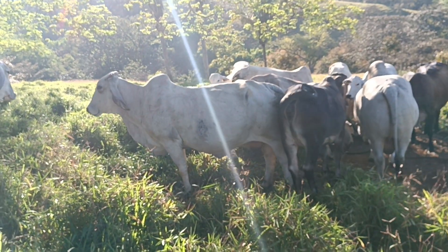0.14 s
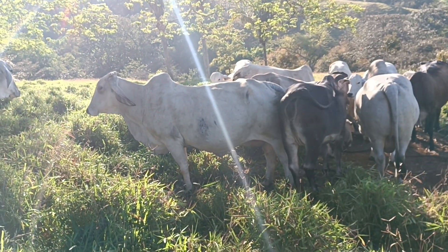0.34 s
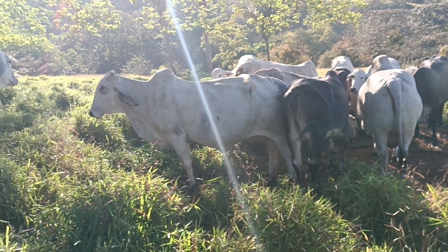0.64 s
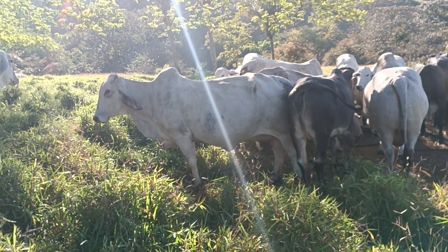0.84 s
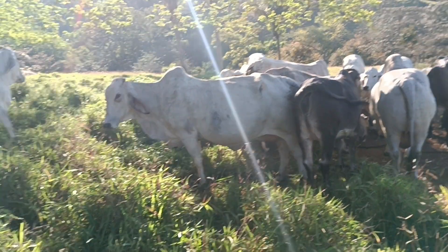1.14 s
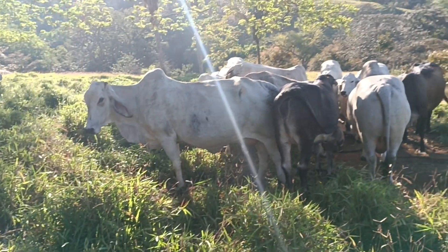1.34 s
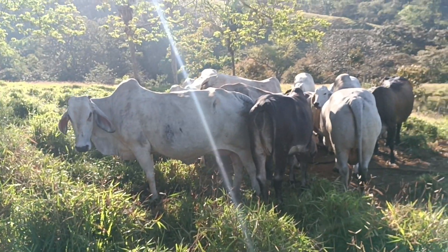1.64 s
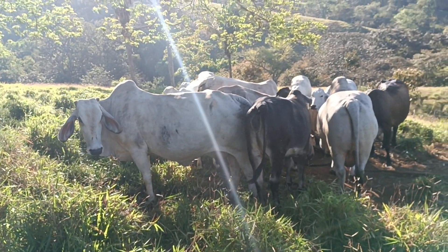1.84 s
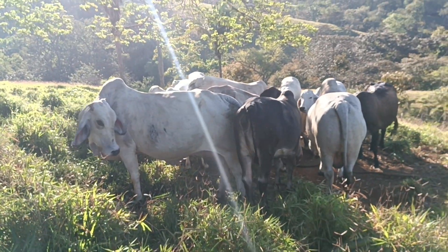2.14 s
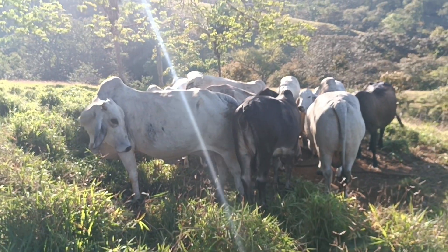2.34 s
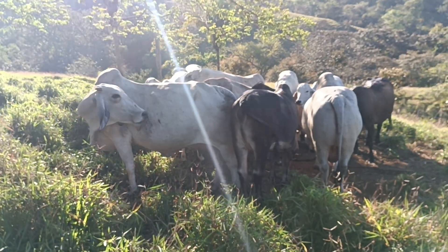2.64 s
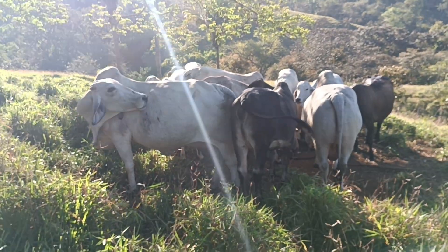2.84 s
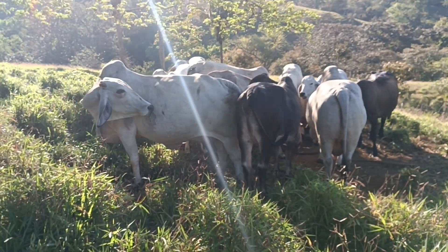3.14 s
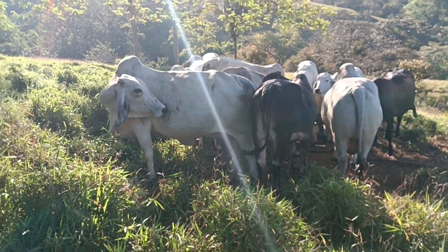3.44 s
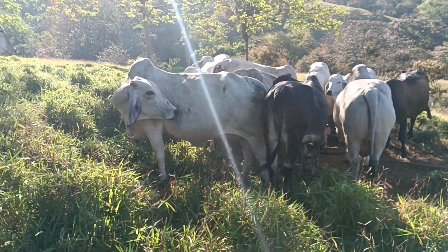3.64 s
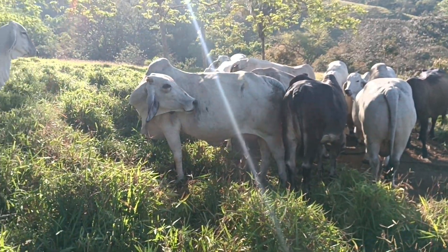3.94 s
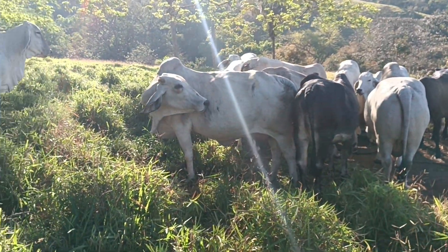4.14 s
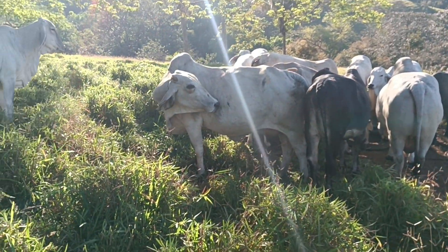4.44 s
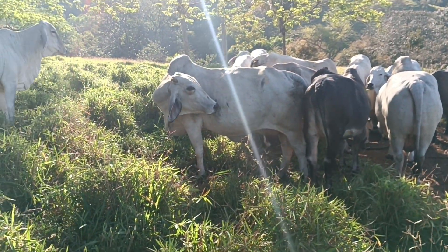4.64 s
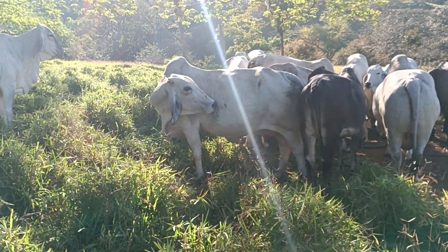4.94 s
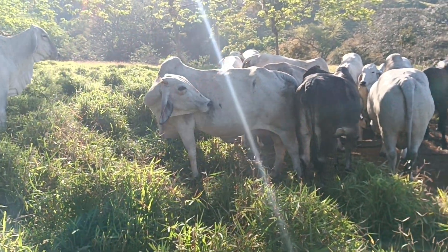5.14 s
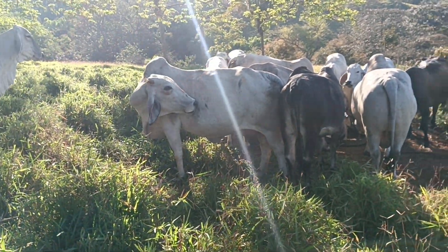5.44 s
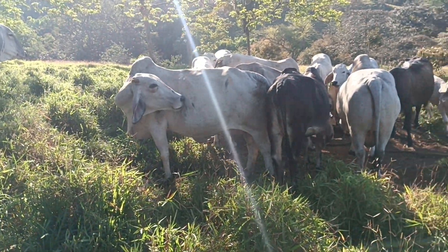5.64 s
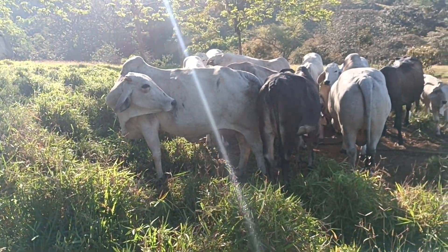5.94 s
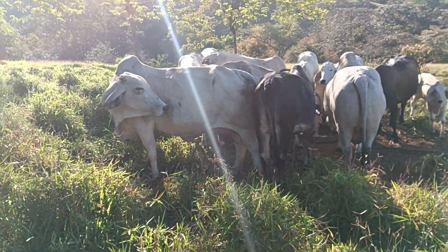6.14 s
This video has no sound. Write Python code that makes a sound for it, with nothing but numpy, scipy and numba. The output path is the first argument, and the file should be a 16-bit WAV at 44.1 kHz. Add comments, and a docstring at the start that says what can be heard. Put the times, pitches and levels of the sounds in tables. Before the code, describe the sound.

Breezy outdoor cattle field with low lumpy wind, twittering flock, dry grass rustles, faint scrapes, late clear bird whistles and two nose breaths.

```python
"""Breezy pasture with cattle and birds

Two phone ports hear wind as lumpy low noise, with sharp pops strongest at the right port. One bird whistles
three long calls of partials; a far flock chatters in short glides, with clear notes and squeaks nearer.
Cattle huff as noise through two resonances; short scrapes and grass are uneven clicks, over a far hiss.
"""
import sys
import numpy as np
from scipy import signal
from scipy.fft import rfft, irfft, next_fast_len
from scipy.io import wavfile
from scipy.ndimage import uniform_filter1d
from numba import njit

SR = 44100
rng = np.random.default_rng(int(sys.argv[2]) if len(sys.argv) > 2 else 0)


def master_out(mix):
    """Clip the mix to full scale and print it as 16-bit PCM to the path in sys.argv[1]."""
    frames = np.transpose(np.atleast_2d(mix))
    ceiling = np.clip(frames, -1, 1)
    pcm = np.round(ceiling * 32767).astype(np.int16)
    wavfile.write(sys.argv[1], SR, pcm)


N = 276759
T = np.arange(N) / SR
PORT_LAG_SAMPLES, WHISTLE_LAG_SAMPLES = 24, 23  # the whistle too reaches the left port first, by nearly the same lag


def undb(db):
    """Decibels to amplitude gain."""
    return 10 ** (np.asarray(db) / 20)


def level(x, db):
    """Scales x to an RMS level over all its samples."""
    return x * undb(db) / np.sqrt(np.mean(x ** 2))


def curves(rows):
    """Interpolates each column after the time over the whole scene."""
    s, *columns = np.transpose(rows)
    return [np.interp(T, s, c) for c in columns]


def colour(x, points):
    """Shapes a spectrum by (frequency [Hz], gain [dB]) points; -99 dB outside them."""
    length = x.shape[-1]
    size = next_fast_len(length)
    hz, db = np.transpose(points)
    log_bins = np.log(np.arange(size // 2 + 1) * SR / size + 1)
    gain = undb(np.interp(log_bins, np.log(hz), db, -99, -99))
    return irfft(rfft(x, size) * gain, size)[..., :length]


@njit
def svf(x, hz, width_hz):
    """State-variable band-pass with a moving centre, gain 1 there."""
    y, band, low = np.empty(len(x)), 0., 0.
    for i in range(len(x)):
        g, k = np.tan(np.pi * hz[i] / SR), width_hz / hz[i]
        v = (band + g * (x[i] - low)) / (1 + g * (g + k))
        band, low, y[i] = 2 * v - band, low + 2 * g * v, k * v
    return y


def walk(rate_hz):
    """Random levels held 1 / rate_hz s and slewed twice; spread near 1."""
    k = int(SR / rate_hz)
    steps = np.repeat(rng.standard_normal(N // k + 1), k)
    return 1.19 * uniform_filter1d(uniform_filter1d(steps, k), k)[:N]


def add(out, x, s):
    """Mixes x into out from time s, cut at the end."""
    i = int(s * SR)
    out[..., i:i + x.shape[-1]] += x[..., :max(N - i, 0)]


def apart(pan_db):
    """Gains of two unrelated port signals whose mean has level 1."""
    return 2 / np.sqrt(1 + undb(2 * np.array([-pan_db, pan_db])))


def ports(x, pan_db, lag_samples=PORT_LAG_SAMPLES):
    """Far sound reaches the left port first."""
    return np.array([x * undb(pan_db / 2), np.roll(x * undb(-pan_db / 2), lag_samples)])


def note(rows, partials, fade_s, rough):
    """A bird's note from rows (time [s], pitch [Hz], level [dB]): partials on one pitch, hoarse, faded at both ends."""
    s, hz, db = np.transpose(rows)
    t = np.arange(s[0], s[-1], 1 / SR)
    phase = 2 * np.pi * np.cumsum(np.interp(t, s, hz)) / SR
    edge = np.clip(np.minimum(t - t[0], t[-1] - t) / fade_s, 0, 1)
    # hoarseness: phase and amplitude waver by noise about 200 Hz wide
    phase_waver, level_waver = uniform_filter1d(rng.standard_normal((2, len(t))), 100) * 10 * rough
    tone = sum(undb(d) * np.sin(k * phase + phase_waver) for k, d in partials if k * hz.max() < .45 * SR)
    return np.sqrt(2) * tone * (1 + level_waver) * edge * undb(np.interp(t, s, db))


def glide(s, length_s, first_hz, last_hz, bow_hz, db, ends_db):
    """Rows of a note that slides between two pitches along a bow and swells in the middle."""
    u = np.linspace(0, 1, num=12)
    arch = 4 * u * (1 - u)
    hz = first_hz + (last_hz - first_hz) * u + bow_hz * arch
    return np.c_[s + u * length_s, hz, db + ends_db * (1 - arch)]


# wind at the ports: (time [s], level [dB], left minus right [dB], flutter above the rumble [dB])
WIND_CURVES = [(0, -41.5, -1, -0.5), (.3, -40.5, -11, 0.5), (.55, -41.5, -9.5, -0.5), (.8, -41, -19, 1),
               (1.2, -45, -14, -1.5), (1.5, -44, -7.5, -2), (1.8, -48, -12, 0), (2.1, -46, -5.5, -2),
               (2.45, -41.5, -20, 3.5), (2.72, -47, -11.5, 1), (3.1, -43.5, -20, 1), (3.39, -39.5, -23, 1),
               (3.5, -46, -10.5, -1.5), (3.85, -42.5, -8, -1), (4.25, -44.5, -14, -1), (4.4, -50.5, -11, 0),
               (5.1, -54, -1, -2), (5.4, -54.5, -14, -2.5), (5.7, -49, 7, -4), (6.0, -50.5, -12, 0),
               (6.28, -44.5, -12, 1)]
# wind spectrum: (frequency [Hz], relative density [dB per Hz])
WIND_SPECTRUM = [(15, -46), (25, -33.5), (67, 2.5), (134, 2.5), (181, -4.5), (297, -13.5), (335, -16),
                 (372, -20), (900, -41), (1170, -61), (1980, -120)]
# single buffets that stand out: (time [s], rise [dB], shift of left minus right [dB])
WIND_BUFFETS = [(0.161, 5.5, -8), (0.269, 6, -6), (.385, 5, 2), (.635, 7, -18), (1.05, 6.5, 1),
                (1.15, 12, -15), (1.31, 2.5, 17), (1.64, 3, -11), (1.96, 0.5, 15), (2.031, 8, 4),
                (2.295, 8.5, 0), (2.607, 8, -4), (3.79, 2.5, -3), (4.07, 5, -14), (4.96, 3.5, 0),
                (5.58, 9.5, 17), (5.68, 8, 10)]
BUFFET_S, GUST_DB, GUST_PAN_DB, GUST_HZ = 0.011, 1.5, 6, 12
RUMBLE_HZ, RUMBLE_PAN_SHARE = 95.6, 0.37  # the deepest wind is shared more evenly by the ports


def wind():
    """Each port has its own eddies: low noise that comes in quick lumps."""
    db, pan_db, flutter_db = curves(WIND_CURVES)
    db = db + GUST_DB * walk(GUST_HZ)
    pan_db = pan_db + GUST_PAN_DB * walk(GUST_HZ)
    for s, rise_db, shift_db in WIND_BUFFETS:
        bump = np.exp(-((T - s) / BUFFET_S) ** 2)
        db, pan_db = db + rise_db * bump, pan_db + shift_db * bump
    lumps = np.array([undb(1.2 * walk(24) + 3.2 * walk(70)) * rng.standard_normal(N) for _ in range(4)])
    eddies = colour(lumps, WIND_SPECTRUM)
    eddies = eddies / eddies.std(axis=1, keepdims=True) * undb(db)
    deep = colour(eddies, [(1, 0), (RUMBLE_HZ, 0), (1.87 * RUMBLE_HZ, -30)])
    # large slow eddies make the rumble, small ones the flutter above it
    rumble = deep[:2] * apart(RUMBLE_PAN_SHARE * pan_db)
    flutter = (eddies - deep)[2:] * undb(flutter_db) * apart(pan_db)
    return rumble + flutter


# eddies that pop on the right port: (time [s], push peak [dB], push time scale [ms], wobble re push [dB])
POP_EVENTS = [(.908, -14, 0.31, -7), (0.9126, -17, 0.17, -4.5), (.956, -40, .32, -6), (1.037, -24, 0.34, 9),
              (1.127, -38, 0.35, 13), (1.147, -36, 0.27, 14.5), (1.18, -36.5, 0.28, -10),
              (1.361, -33.5, .37, 5), (1.398, -31.5, 0.11, 1), (1.409, -36, 0.18, -2), (1.878, -40, .47, 3),
              (2.369, -38, 0.45, -4), (2.702, -38, 0.27, 4), (3.322, -33, 0.5, -2),
              (3.356, -25.5, 0.39, 2.5), (3.395, -37, .49, 8), (4.801, -32.5, 0.42, 5),
              (5.437, -38.5, .44, -17), (6.133, -41, 1, 13), (6.178, -31, 0.17, -9),
              (6.184, -23.5, 0.35, 1), (6.215, -25.5, .71, 2), (6.231, -29.5, 0.11, -22),
              (6.2342, -31, .1, -6), (6.239, -36, 0.47, -4)]
WOBBLE_HZ, WOBBLE_DECAY_S, POP_LEFT_DB = 188, 0.0042, -33


def pops():
    """A sharp in-out push on the membrane, then a slow wobble of the air in the port."""
    out, t = np.zeros((2, N)), np.arange(1200) / SR
    after = np.maximum(t - .0032, 0)
    wobble = np.sin(2 * np.pi * WOBBLE_HZ * after) * np.exp(-after / WOBBLE_DECAY_S)
    for s, db, push_ms, wobble_db in POP_EVENTS:
        u = (t - .003) / (push_ms / 1000)
        push = u * np.exp(.5 - u ** 2 / 2)
        pop = undb(db) * (push - undb(wobble_db) * wobble)
        add(out, pop * undb([[POP_LEFT_DB], [0]]), s)
    return out


# calls: (time [s], length [s], first pitch [Hz], settled pitch [Hz], settling time constant [s],
# fundamental level [dB], its slope [dB/s], overtone level [dB], its slope [dB/s])
WHISTLE_CALLS = [(4.283, .21, 1202, 1294, 0.082, -46.5, -2, -62.5, 5),
                 (4.812, 0.49, 1229, 1313, 0.086, -49.5, -20, -61.5, 0.5),
                 (5.5, .5, 2459, 2538, .4, -99, 0, -62.5, -28)]
# per call, the partial near 2.5 kHz throbs and sways as it meets its own echoes, and rings on after the last
# call: (time [s], level [dB], left minus right [dB])
WHISTLE_THROB = [
    [(4.283, -57, 6), (4.3, -41, 10), (4.35, -44.5, 4), (4.4, -49, 5), (4.493, -55, 1)],
    [(4.812, -43, 0), (4.834, -35, 4), (4.9, -48.5, -1), (4.99, -38, 1), (5.06, -46.5, 0),
     (5.115, -41, -6.5), (5.15, -47, 3), (5.22, -37.5, 1), (5.25, -49, -4), (5.275, -38, 0),
     (5.307, -64, -6)],
    [(5.5, -46, 2), (5.52, -37.5, -4), (5.55, -33.5, -7.5), (5.6, -48, -4), (5.645, -31.5, -8.5),
     (5.7, -47.5, -11), (5.735, -38, -5), (5.775, -32, -3.5), (5.84, -55, 3), (5.873, -34, -2),
     (5.898, -51, -2), (5.922, -33.5, -9.5), (5.96, -58, -8), (6.05, -54.5, -9), (6.28, -58, -2)],
]
# overtones of the two low calls: (multiple [-], relative level [dB])
LOW_CALL_PARTIALS = [(3, -0.5), (4, -1.5), (5, -2), (6, -15), (7, -8), (8, -13), (9, -29)]
# overtones of the high call: (multiple [-], relative level [dB])
HIGH_CALL_PARTIALS = [(2, 3.5), (3, 6), (4, 7), (5, 0), (6, -14)]
END_SAG, END_SAG_S = 0.01183, 0.0645  # share of pitch lost as the breath runs out
FLUTTER_DB, FLUTTER_HZ = 4, 22  # each overtone wavers by itself
BLOOM_DB, BLOOM_S = -1, 0.11  # overtones start this much weaker per multiple and catch up


def whistler():
    """Two calls rich in partials, then one an octave up; each rises in pitch and its strongest partial throbs."""
    out = np.zeros((2, N))
    strong_multiples = (2, 2, 1)
    overtone_sets = (LOW_CALL_PARTIALS, LOW_CALL_PARTIALS, HIGH_CALL_PARTIALS)
    for call, throb, strong, overtones in zip(WHISTLE_CALLS, WHISTLE_THROB, strong_multiples, overtone_sets):
        s, length_s, first_hz, last_hz, settle_s, low_db, low_slope, over_db, over_slope = call
        at, throb_db, pan_db = np.transpose(throb)
        t = np.arange(0, max(at[-1] - s, length_s), .002)
        held = t < length_s
        hz = last_hz + (first_hz - last_hz) * np.exp(-t / settle_s)
        hz = hz * (1 - END_SAG * np.exp(np.minimum(t - length_s, 0) / END_SAG_S))
        voice = np.zeros(N)
        strong_rows = np.c_[s + t, hz, np.interp(s + t, at, throb_db)]
        add(voice, note(strong_rows, [(strong, 0)], 0.0033, 0.042), s)
        low_rows = np.c_[s + t, hz, low_db + low_slope * t][held]
        add(voice, note(low_rows, [(1, 0)], 0.014, .033), s)
        for partial in overtones:
            waver_db = FLUTTER_DB * np.interp(s + t, T, walk(FLUTTER_HZ))
            bloom_db = BLOOM_DB * partial[0] * np.exp(-t / BLOOM_S)
            rows = np.c_[s + t, hz, over_db + over_slope * t + waver_db + bloom_db][held]
            add(voice, note(rows, [partial], 0.0061, .05), s)
        out += ports(voice, np.interp(T, at, pan_db), WHISTLE_LAG_SAMPLES)
    return out


def chatter(throats, rough):
    """Many short gliding notes that overlap, from birds at all distances."""
    out = np.zeros(N)
    for hz, spread_hz, throat_db in throats:
        for at, pitch, slide, size, long in rng.random((300, 5)):
            mid_hz = hz + spread_hz * 3 * (pitch - .5)
            length_s = .015 + .04 * long
            start, note_db = at * T[-1], throat_db + 13 * size
            end_hz = mid_hz * (1 + 0.1018 * (slide - .5))
            rows = [(start, mid_hz, note_db), (start + length_s, end_hz, note_db)]
            add(out, note(rows, [(1, 0)], length_s / 2.3, rough), start)
    return level(out, 0)


# clear notes: (time [s], length [s], first pitch [Hz], last pitch [Hz], bow of the pitch [Hz], mid level [dB])
CLEAR_NOTES = [(.03, .07, 2800, 3440, 60, -52), (.11, 0.043, 1880, 1873, 3, -55),
               (.155, 0.058, 3030, 2885, -2, -43.5), (0.116, 0.031, 3750, 3770, 0, -58),
               (.325, 0.061, 3700, 3550, 64, -60), (.33, 0.043, 2980, 2905, -2, -51),
               (.5, .03, 3080, 3010, 0, -47), (.54, 0.042, 3120, 3215, 3, -43.5),
               (.612, 0.061, 3170, 3094, 4, -44.5), (.77, 0.037, 3050, 3150, 6, -51),
               (.885, 0.083, 3150, 3270, -2, -51), (1.0, 0.024, 2980, 2930, 0, -46),
               (1.228, 0.09, 2800, 3197, 230.5, -42.5), (1.307, 0.0244, 3255, 2590, 100, -40),
               (1.335, 0.075, 2900, 2920, -65, -49), (1.398, 0.026, 3350, 3370, 44, -46),
               (1.45, 0.041, 3200, 3070, -3, -57), (1.6, 0.049, 3100, 3105, 0, -54),
               (1.68, 0.056, 1920, 2050, -9, -58), (1.76, .11, 3020, 2845, 66, -49),
               (1.805, 0.027, 2030, 2040, 0, -53), (1.92, 0.027, 3080, 3040, -2, -48),
               (1.94, 0.031, 1910, 1930, -7, -52), (1.975, .085, 3130, 3096, 1.5, -44),
               (2.03, 0.033, 1920, 1990, -4, -56), (2.07, 0.043, 3080, 3030, -4, -47),
               (2.29, 0.041, 3100, 3220, -4, -53), (2.46, 0.043, 3200, 3130, 110, -46.5),
               (2.508, 0.024, 3100, 3040, 0, -43), (2.53, 0.038, 1990, 2060, -15, -47),
               (2.553, 0.064, 3100, 3215, -6, -46.5), (2.61, 0.034, 1900, 1970, -5, -51.5),
               (2.78, 0.039, 3070, 3040, -7, -48), (2.921, .05, 3500, 3640, -2, -54.5),
               (3.019, 0.037, 3850, 3910, 0, -55), (3.055, 0.064, 3140, 3205, 0, -49),
               (3.17, 0.036, 1820, 1900, 0, -53), (3.35, 0.048, 3150, 3000, 2, -51.5),
               (3.5, 0.066, 3350, 3250, 0, -48.5), (3.535, 0.028, 1930, 1954, -5, -53.5),
               (3.67, 0.039, 2880, 3100, -5, -53), (3.82, 0.074, 3110, 3050, -6, -50),
               (3.885, 0.06, 3100, 3173, 3, -46), (4.11, 0.033, 3050, 2970, 2, -49.5),
               (4.155, 0.024, 2100, 2320, -2, -51.5), (4.195, 0.043, 3080, 3020, 2, -46.5),
               (4.33, 0.026, 1920, 1880, 0, -54), (5.67, 0.038, 3010, 3060, 0, -47),
               (5.74, 0.065, 3070, 3100, 0, -47), (5.83, 0.081, 3200, 3540, -42, -50),
               (6.035, .06, 3050, 3150, 0, -56)]
NOTE_ENDS_DB, OCTAVE_DB, NOTE_ROUGH = -2, -21.5, .13  # ends re middle, second partial, hoarseness 0-1


def clear_notes():
    """The nearest birds of the flock: bowed glides with a weak second partial."""
    out = np.zeros(N)
    for row in CLEAR_NOTES:
        rows = glide(*row, NOTE_ENDS_DB)
        add(out, note(rows, [(1, 0), (2, OCTAVE_DB)], .006, NOTE_ROUGH), row[0])
    return out


# squeaks: (time [s], length [s], first pitch [Hz], last pitch [Hz], bow of the pitch [Hz], mid level [dB],
# hoarseness [0-1])
SQUEAK_NOTES = [(0.48, .07, 5500, 6000, 75, -58, .2), (1.62, .05, 8900, 8200, 0, -70, .1),
                (1.69, .15, 7750, 7900, -500, -62.5, 0.2), (2.84, .115, 8100, 4000, -550, -58, 0.37),
                (2.832, 0.081, 6600, 3900, -100, -62, .9), (3.0, .11, 1800, 750, -100, -54.5, 0.47),
                (5.855, .12, 1650, 1650, 130, -48.5, 0.54), (3.099, 0.19, 5950, 6360, 99, -53, 0.3),
                (3.21, .08, 6300, 6900, 100, -56, 0.5), (3.04, 0.15, 7300, 8400, 347, -63, .25),
                (4.87, 0.057, 7100, 7000, -60, -56.5, 0.5), (5.071, .1, 10800, 10930, 0, -60, .3),
                (5.393, 0.21, 11200, 9700, -2, -65, 0.3), (5.668, 0.098, 7400, 7800, 197, -55, .4),
                (5.617, 0.17, 5870, 6380, -77, -51.5, 0.4)]
SQUEAK_ENDS_DB = -10  # re middle


def squeaks():
    """Thin squeaks of small birds: one hoarse gliding partial each."""
    out = np.zeros(N)
    for *row, rough in SQUEAK_NOTES:
        add(out, note(glide(*row, SQUEAK_ENDS_DB), [(1, 0)], 0.014, rough), row[0])
    return out


# flock chatter: (time [s], main voices level [dB], lower voices level [dB], upper voices level [dB],
# left minus right [dB])
FLOCK_CURVES = [(0, -49.5, -62, -70, 1), (.35, -58, -60, -67, -1.5), (.55, -51.5, -57.5, -64, -2),
                (.78, -52, -57, -60, -3.5), (.93, -54, -53, -65, -3.5), (1.03, -60.5, -65, -71, -2),
                (1.25, -52.5, -59.5, -67, -7), (1.62, -54.5, -65.5, -66.5, -4.5),
                (1.8, -53.5, -61, -63, -5), (2.0, -53, -63.5, -64, -4), (2.48, -55, -56.5, -67, -4),
                (2.85, -65, -65, -67.5, 2), (2.95, -48, -55.5, -67, -2), (3.25, -58, -59, -76, -3.5),
                (3.58, -54, -59, -70.5, -1.5), (4.05, -54.5, -61.5, -68, -2), (4.37, -53, -58.5, -63, -4),
                (4.72, -63, -55, -76, -7), (4.89, -59, -61, -61, 0.5), (5.2, -64, -65, -69, 2),
                (5.55, -62, -56, -69, -4), (5.72, -52.5, -58, -64, -4.5), (6.1, -56.5, -59, -67, -4),
                (6.28, -73, -80, -72, -4)]
# throats of the main, lower and upper voices: (pitch [Hz], a third of the pitch range [Hz], lowest relative level [dB])
THROAT_GROUPS = [
    [(2753, 266, -6.5), (3032, 168.3, 1.5), (3606, 201.6, -7.5)],
    [(1526, 118.4, -5), (1958, 150.2, 1), (2372, 141.5, -2)],
    [(4480, 270, 5.5), (5450, 510, -2), (6570, 149.4, 8)],
]
CHATTER_SWELL_DB = 1.3


def flock():
    """Three groups of voices chatter far off; returns them and the near notes, each at the ports."""
    *group_db, pan_db = curves(FLOCK_CURVES)
    far = np.zeros(N)
    for throats, rough, db in zip(THROAT_GROUPS, (.3, .4, .8), group_db):
        far += undb(db) * chatter(throats, rough) * undb(CHATTER_SWELL_DB * walk(8))
    return ports(far, pan_db), ports(clear_notes() + squeaks(), pan_db)


TREES_T60_S, TREES_DB = 0.65, -3
NEAR_TREES_DB, WHISTLER_TREES_DB = -7, -7  # echo send re the far flock


def trees(far, near, calls):
    """Trees and slopes scatter the birds back as a short diffuse tail, different at each port."""
    t = np.arange(SR // 2) / SR
    tail = rng.standard_normal((2, len(t))) * np.exp(-np.log(1000) * t / TREES_T60_S) * (t > .005)
    tail = tail / np.sqrt(np.sum(tail ** 2, axis=1, keepdims=True))
    birds = far + undb(NEAR_TREES_DB) * near + undb(WHISTLER_TREES_DB) * calls
    return undb(TREES_DB) * signal.fftconvolve(birds, tail, axes=1)[:, :N]


# two huffs through the nose: (time [s], level [dB], first resonance [Hz], second resonance [Hz], second re first [dB])
HUFF_CURVES = [
    [(4.35, -61, 440, 1300, -22), (4.45, -58.5, 467, 1300, -19), (4.6, -53.5, 467, 1390, -9),
     (4.8, -53.5, 433, 1220, -10), (5.0, -62.5, 443, 1200, -5), (5.1, -79, 405, 1190, -14)],
    [(5.42, -65.5, 495, 1142, -2), (5.52, -54.5, 479, 1070, -0.5), (5.62, -52.5, 445, 1140, -3),
     (5.75, -55, 422, 940, 1.5), (5.85, -57.5, 370, 795, -5), (6.1, -61.5, 330, 805, -23),
     (6.28, -63, 352, 800, -11)],
]


def cattle():
    """Turbulent breath through two moving resonances of the nose."""
    db, low_hz, high_hz, high_db = curves(HUFF_CURVES[0] + HUFF_CURVES[1])
    own, shared = rng.standard_normal((2, N)), rng.standard_normal(N)
    air = (own + 1.95 * shared) * undb(1.8 * walk(30))
    out = []
    for a in air:
        first = level(svf(svf(a, low_hz, 147.0), low_hz, 147.0), 0)
        second = level(svf(a, high_hz, 93.0), 0)
        out.append(first + undb(high_db) * second)
    return np.array(out) * undb(db) * (T > HUFF_CURVES[0][0][0])


# rough scrapes of tongues and hooves: (time [s], length scale [s], level before the envelope [dB], centre [Hz],
# width [Hz], left minus right [dB])
SCRAPE_EVENTS = [(0.503, 0.039, -56.5, 4180, 2500, -4), (1.317, 0.02, -63, 4500, 3000, 2),
                 (1.403, 0.034, -57, 2980, 4000, -12), (1.679, 0.029, -58, 1200, 1000, 1),
                 (2.376, 0.11, -62.5, 5000, 2500, 1), (2.644, 0.039, -58, 970, 200, 0),
                 (2.92, 0.28, -65, 2600, 2970, 2), (2.956, 0.029, -57, 716, 300, 2),
                 (3.052, 0.066, -56.5, 874, 400, 0), (3.127, 0.042, -53.5, 650, 250, -1),
                 (3.472, 0.17, -59, 3970, 2960, -17), (3.664, 0.12, -64.5, 4770, 2000, -13),
                 (3.937, 0.057, -60, 4500, 3000, -4), (4.273, 0.057, -54.5, 784, 400, 3.5),
                 (4.447, 0.38, -56, 2190, 890, 1), (5.544, 0.14, -51, 1760, 1200, -5)]


def scrapes():
    """Dense uneven clicks in a broad resonance, quick to start and slower to end."""
    out, size = np.zeros((2, N)), SR // 2
    for s, length_s, db, hz, width_hz, pan_db in SCRAPE_EVENTS:
        clicks = rng.standard_normal((2, size)) * undb(2.2 * rng.exponential(size=size))
        u = np.arange(size) / SR / length_s
        envelope = np.minimum(5 * u, 1) * np.exp(-u ** 3)
        body = level(np.array([svf(c, np.full(size, 1. * hz), 1. * width_hz) for c in clicks]), db)
        add(out, body * envelope * apart(pan_db)[:, None], s)
    return out


# dry grass by the left port: (time [s], level [dB])
RUSTLE_CURVE = [(0, -47.5), (.07, -54.5), (.19, -58), (.28, -51.5), (.38, -53), (.56, -65.5), (.68, -60),
                (.79, -51.5), (.86, -47.5), (1.17, -60), (1.25, -57), (1.31, -67.5), (2.3, -66.5),
                (2.75, -65), (3.03, -65), (3.1, -62), (3.17, -63), (3.25, -64), (3.5, -67.5), (4.4, -68.5),
                (5.3, -65), (5.58, -64), (5.74, -58.5), (5.9, -68), (6.28, -70)]
# rustle spectrum: (frequency [Hz], relative density [dB per Hz])
RUSTLE_SPECTRUM = [(4000, -14.5), (6000, -17), (7500, -19), (11000, -7.5), (15800, -11), (17000, -2.5)]
# single stalks that snap: (time [s], initial level before the high-pass [dB], left minus right [dB])
STALK_SNAPS = [(0.2638, -52, 23.5), (1.2256, -56, 20.0), (1.3688, -64, 13.0), (1.4571, -66, 17),
               (2.7394, -62, 17.0), (3.0475, -58, 15.5), (3.5696, -51, 22), (4.075, -57, 13),
               (4.5775, -56, 17.5), (4.7311, -55, 17.0), (6.218, -66, 12.5)]
RUSTLE_RIGHT_DB = -23
SETTLE_DB, SETTLE_S = -11, 0.018  # blades around a snapped stalk rustle briefly, before and after


def grass():
    """Dense tiny stalk clicks blur into hiss; a few snap alone."""
    grains = rng.standard_normal((2, N)) * undb(2.0 * rng.exponential(size=N)) * undb(1.0 * walk(12))
    stir, snaps, t = undb(curves(RUSTLE_CURVE)[0]), np.zeros((2, N)), np.arange(600) / SR
    for s, db, pan_db in STALK_SNAPS:
        burst = rng.standard_normal((2, 600)) * np.exp(-t / 0.0051)
        add(snaps, burst * undb(db) * apart(pan_db)[:, None], s)
        stir = stir + undb(db + SETTLE_DB) * np.exp(-np.abs(T - s - .01) / SETTLE_S)
    hiss = level(colour(grains, RUSTLE_SPECTRUM), 0) * stir * undb([[0], [RUSTLE_RIGHT_DB]])
    high_pass = signal.butter(2, 3000, "high", fs=SR, output="sos")
    return hiss + signal.sosfilt(high_pass, snaps)


# leaves, far insects and microphone hiss: (frequency [Hz], relative density [dB per Hz])
FIELD_SPECTRUM = [(150, -40), (250, -11.5), (500, -18), (950, -16.5), (1300, -21), (2000, -12), (3000, -11),
                  (4200, -23.5), (6400, -28.5), (8200, -40.5), (11800, -47), (15800, -42), (17000, -36)]
# port colouring: (frequency [Hz], left minus right [dB]); the end rows apply at 1 Hz and SR / 2
FIELD_PAN = [(60, -4.0), (110, -10), (200, 2), (380, -1), (700, 4), (1290, -3.5), (2380, -10.5), (4400, 3),
             (8120, 9), (15000, -16)]
FIELD_DB = -55


def field():
    """A nearly steady far hiss, unrelated at the two ports, which colour it differently."""
    hz, pan_db = np.transpose(FIELD_PAN)
    hiss = level(colour(rng.standard_normal((2, N)), FIELD_SPECTRUM), FIELD_DB) * undb(1.0 * walk(5.6))
    edges_hz = np.r_[1, hz[1:-1], SR / 2]
    return np.array([colour(h, np.c_[edges_hz, side * pan_db / 2]) for h, side in zip(hiss, (1, -1))])


# the hand shades the right port: (frequency [Hz], gain [dB])
HAND_SHADE = [(20, -1.5), (5000, 2), (7500, -10.5), (10000, -27), (20000, -20)]


def scene():
    """Birds, echo and cattle reach a shaded right port; wind, pops, grass and field hiss are added unshaded."""
    calls = whistler()
    far, near = flock()
    left, right = calls + far + near + trees(far, near, calls) + cattle() + scrapes()
    shaded = np.array([left, colour(right, HAND_SHADE)])
    return wind() + pops() + shaded + grass() + field()


TOP_HZ = 15780


def record(dry):
    """The phone cuts the top: steep elliptic low-pass."""
    return signal.sosfilt(signal.ellip(10, .2, 70, TOP_HZ, fs=SR, output="sos"), dry)


dry = scene()
out = record(dry)
master_out(out)
```